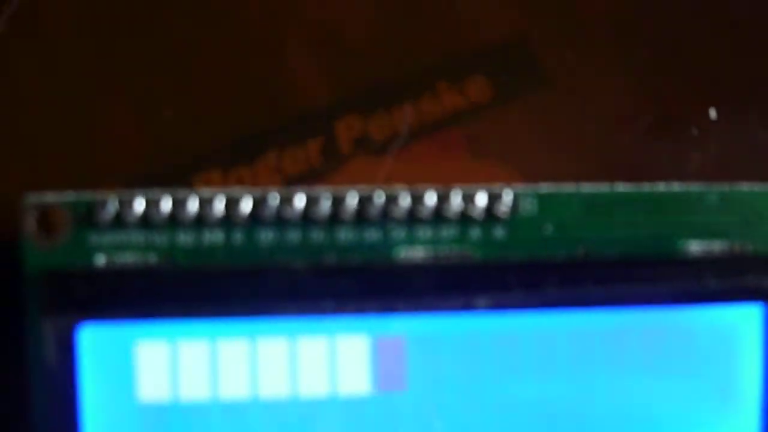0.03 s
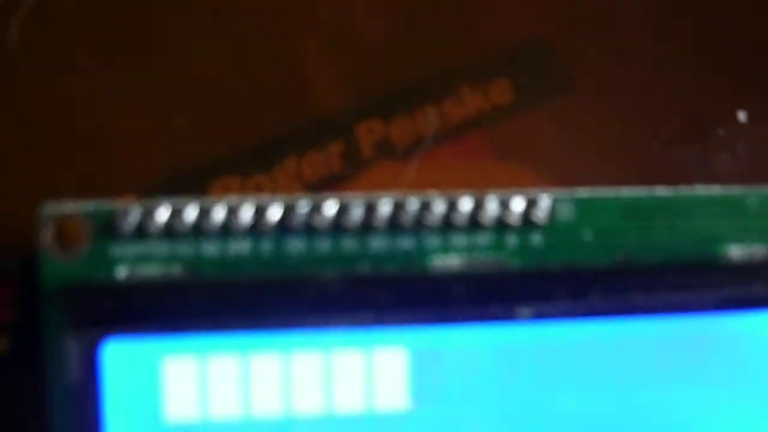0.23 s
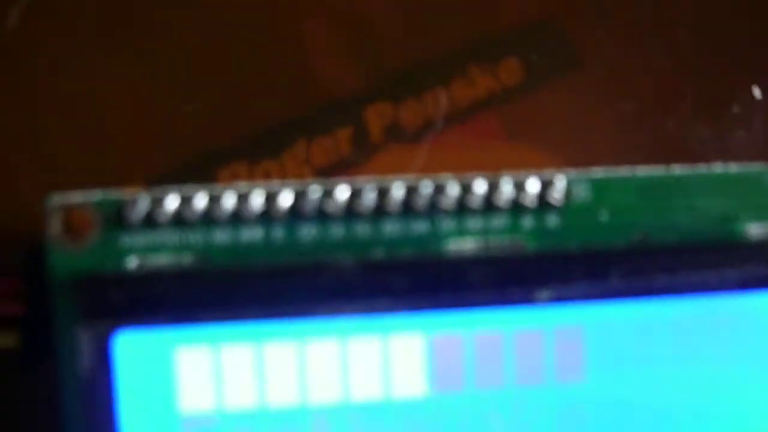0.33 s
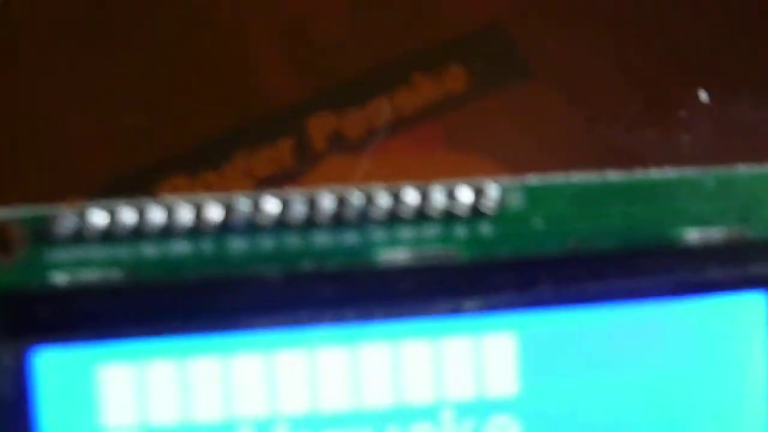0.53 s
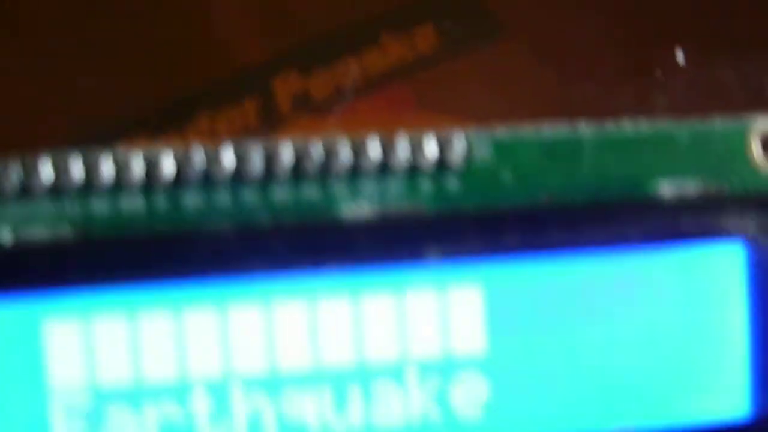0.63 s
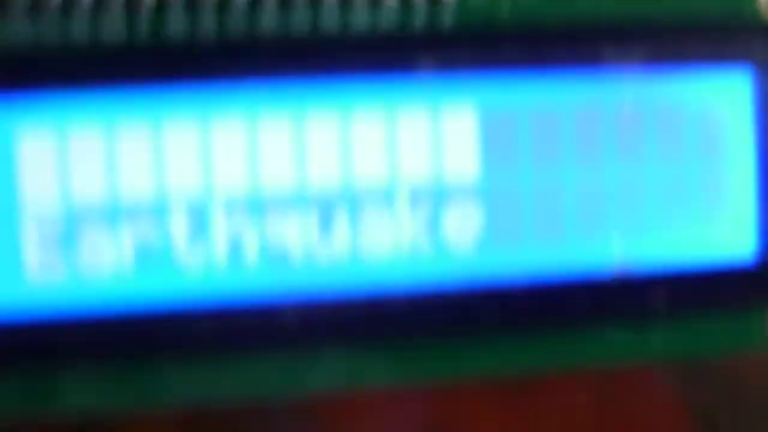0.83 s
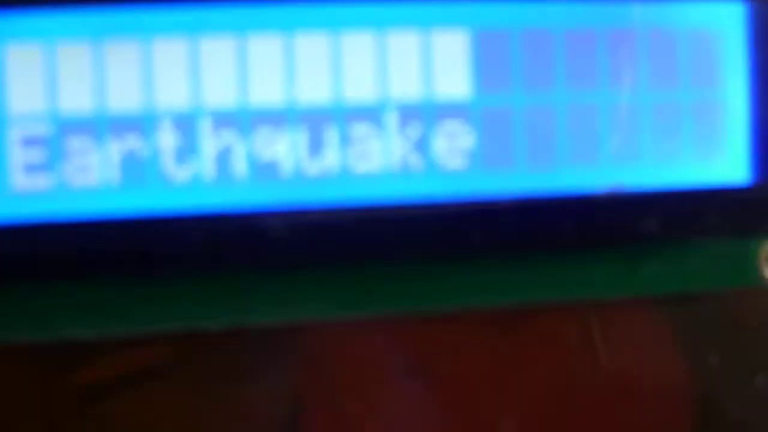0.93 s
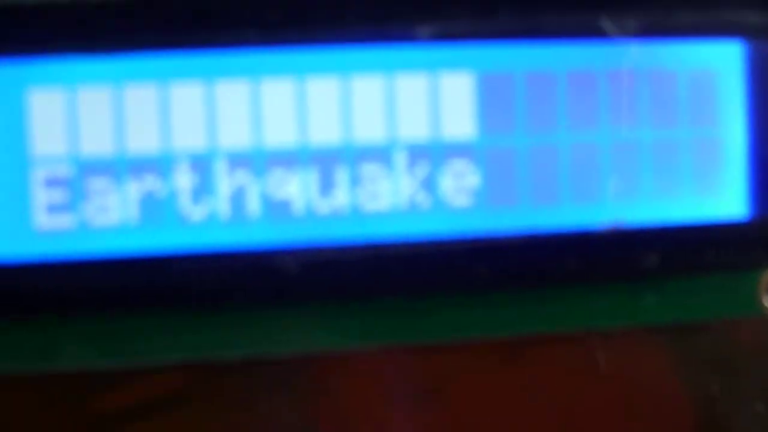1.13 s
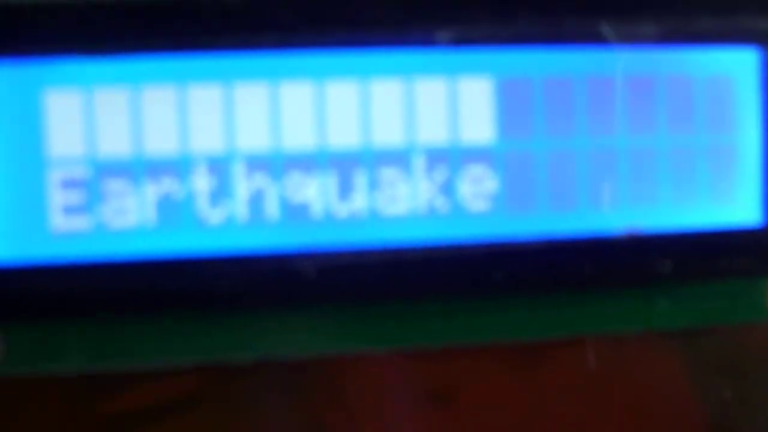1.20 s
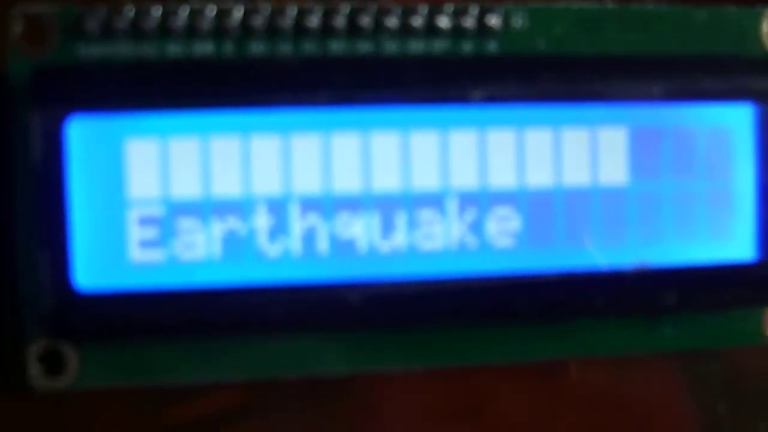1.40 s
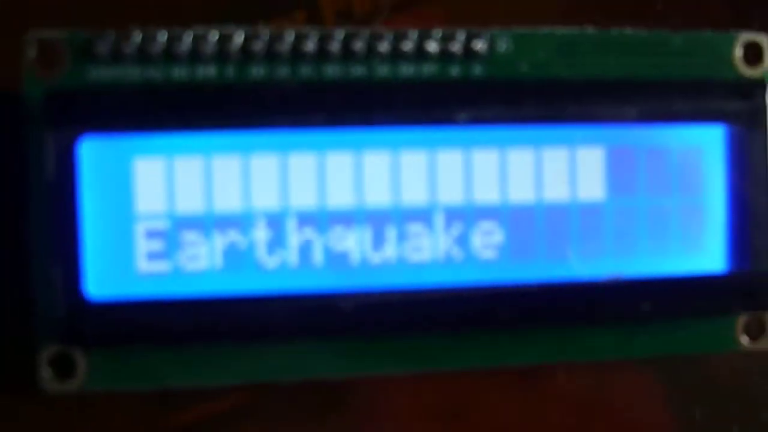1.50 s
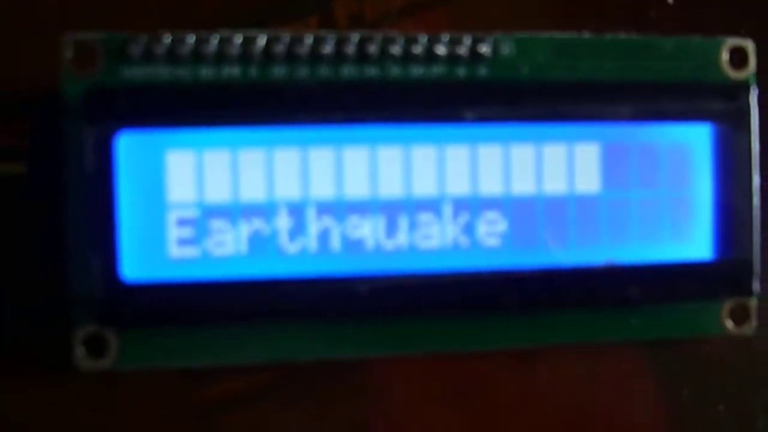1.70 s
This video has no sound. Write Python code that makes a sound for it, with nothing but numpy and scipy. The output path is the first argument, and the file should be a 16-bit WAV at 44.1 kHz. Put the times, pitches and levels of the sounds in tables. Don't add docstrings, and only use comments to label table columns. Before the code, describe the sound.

One hard hand bang on a wooden table, loose parts clattering briefly, over low room hum

```python
import sys
import numpy as np
from scipy import signal
from scipy.io import wavfile

SR = 44100
rng = np.random.default_rng(int(sys.argv[2]) if len(sys.argv) > 2 else 0)


def boost_factor(decibels):
    exponent = np.asarray(decibels, float) / 20
    return 10 ** exponent


def dump_mix(stems):
    frames = np.atleast_2d(stems).T
    limited = np.clip(frames, -1, 1)
    pcm = np.round(limited * 32767).astype(np.int16)
    wavfile.write(sys.argv[1], SR, pcm)


N = 77175

# f/Hz, level/dB [dB per Hz]
AIR_SPECTRUM = [(18, -40), (30, -26), (107, 1), (161, -10.5), (193, 4.5), (291, -4.5), (343, 0.5),
                (466, 0.5), (4000, -29.5), (5200, -59.5), (8800, -120)]
AIR_DB = -47
# f/Hz, width/Hz, level/dB
DRONES = [(54.6, 3, -58.5), (95.6, 8.4, -58.5), (116.4, 9, -54.5), (197, 5.2, -54), (241.4, 4.3, -57.5)]

# t/s, thud level/dB, crack level/dB, direction/sign
BLOWS = [
    (0.2097, -2, 1, 1),
    (0.2182, -20.5, -12.5, -1),
]
# f/Hz, level/dB, t60/s, direction/sign; the first is stirred by the hand only
TOP_MODES = [(121.6, -2.5, 0.52, -1), (159.8, -0.5, 0.072, 1), (208, -7.5, 0.35, 1), (282.2, -24, 0.34, 1),
             (332.6, -19.5, 0.29, 1), (394, -5, 0.036, 1), (577, -24, 0.13, 1), (620.7, -5, 0.062, 1),
             (940, -19, 0.049, 1), (1296, -31, 0.025, 1), (71.55, -29.5, 1, 1)]
# f/Hz, level/dB, t60/s, direction/sign
CRACK_MODES = [(784, -10, 0.007, 1), (1575, 11, 0.0012, 1), (2330, -11.5, 0.0056, 1), (3556, -14, 0.013, 1),
               (4640, -14, 0.0064, 1), (4910, -25.5, 0.0044, -1), (7550, -36.5, 0.0041, 1)]
PALM_HZ, SLAP_S, SLAP_DB = 507, 0.001, -27

# t/s, thud level/dB, click level/dB, direction/sign
HOPS = [
    (.2395, -17, -21.5, 1),
    (.2590, -13, -36, -1),
    (.2684, -7.5, -6.5, -1),
    (.2781, -12.5, -1.5, 1),
    (.2920, -18, -23, -1),
    (.3010, -39, -15, 1),
    (.3220, -21.5, -19, -1),
]
# f/Hz, level/dB, t60/s, direction/sign
BOARD_MODES = [(790, -17.5, .05, 1), (1058, -15, 0.024, -1), (1517, -13.5, 0.013, 1),
               (2126, -10, 0.011, -1), (3130, -11.5, 0.002, 1), (3960, -11.5, 0.0033, 1),
               (5080, -18.5, 0.009, -1), (5730, -14, 0.0038, 1), (7100, -21, 0.0065, 1)]
HOP_SLAP_S, HOP_SLAP_DB = 0.002, -20
MIC_LOW_HZ = 61.4

# f/Hz, level/dB [dB per Hz]
SHUDDER_SPECTRUM = [(29, -46), (60, -14), (110, -7), (230, -2.5), (500, -18.5), (1800, -31), (8000, -44.5),
                    (10400, -80)]
# t/s, level/dB
SWELLS = [
    (0.213, -18),
    (0.271, -19.5),
]
SHUDDER_DB, SWELL_S, LOW_T60_S, HIGH_T60_S = 24.5, 0.0052, 0.4, 0.44
ROOM_T60_S, ROOM_DB, WALL_HZ = 0.53, -28, 6700

# f/Hz, level/dB, t60/s
CHATTER_MODES = [(615, 13, 0.0027), (1550, 2, 0.0016), (2310, -13, 0.001), (3770, 3, 0.0012),
                 (5940, -7.5, 0.0043)]
RATTLE_PER_S, RATTLE_DB, RATTLE_FROM_S, RATTLE_T60_S = 1200, -31.5, 0.26, 0.28

# t/s, length/s, level/dB
SCUFFS = [
    (1.151, .024, -52),
    (.670, .015, -67),
]
# f/Hz, level/dB, t60/s
SCUFF_MODES = [(1250, -6, .012), (1550, 0, .015), (1850, -2, .01), (2350, -9, .008), (4100, -10, .005)]

CLIP_LEVEL, INPUT_HZ = 0.72, 7500
DUCK_DB, DUCK_S, HOLD_S, RECOVER_S = 9, 0.0025, 0.061, 0.56
HISS_DB, HISS_LOW_HZ, HISS_BUMP_HZ, HISS_BUMP_DB = -65.5, 1500, 7010, 4
TOP_CUT_HZ, DC_OFFSET = 8000 * 1.148, 0.0141


def rms_one(x):
    return x / np.sqrt(np.mean(x ** 2) + 1e-20)


def butter(x, order, hz, kind="low"):
    return signal.sosfilt(signal.butter(order, hz, kind, fs=SR, output="sos"), x)


def ring(clicks, hz, t60_s):
    r = boost_factor(-60 / (t60_s * SR))
    w = 2 * np.pi * hz / SR
    return signal.lfilter([0, np.sin(w)], [1, -2 * r * np.cos(w), r * r], clicks + 1e-18)


def body(clicks, modes):
    out = 0
    for hz, db, t60_s, *direction in modes:
        out = out + boost_factor(db) * np.sign(np.prod(direction)) * ring(clicks, hz, t60_s)
    return out


def burst(start_s, rise_s, fall_s):
    t = np.maximum(np.arange(N) / SR - start_s, 0)
    return (1 - np.exp(-t / rise_s)) * np.exp(-t / fall_s)


def bands(spectrum, gain, count):
    edges = 28 * 2 ** (np.arange(count) / 2)
    white = rng.standard_normal((2, N + SR))
    hz, db = np.transpose(spectrum)
    out = 0
    for k, (low, high) in enumerate(zip(edges, edges[1:])):
        band = butter(white[k % 2], 2, [low, high], "band")[SR:]
        level = boost_factor(np.interp(np.log(low * high) / 2, np.log(hz), db))
        out = out + band * level * gain(np.sqrt(low * high))
    return out


def drift(rate_hz):
    r = np.exp(-2 * np.pi * rate_hz / SR)
    return rms_one(signal.lfilter([1], [1, -2 * r, r * r], rng.standard_normal(N + SR))[SR:])


def air(patchy_db):
    rumble = bands(AIR_SPECTRUM, lambda hz: boost_factor(patchy_db * drift(5)), count=16)
    out = boost_factor(AIR_DB) * rms_one(rumble)
    for hz, width_hz, db in DRONES:
        t60_s = np.log(1000) / np.pi / width_hz
        drone = ring(rng.standard_normal(N + SR), hz, t60_s)[SR:]
        out += boost_factor(db) * rms_one(drone)
    return out


def strikes(contacts, spray_db, spray_s):
    thud, crack = np.zeros(N), np.zeros(N)
    spray = rng.standard_normal(N)
    for s, thud_db, crack_db, direction in contacts:
        i = int(s * SR)
        thud[i] += np.sign(direction) * boost_factor(thud_db)
        crack[i] += np.sign(direction) * boost_factor(crack_db)
        crack += boost_factor(crack_db + spray_db) * spray * burst(s, 1e-4, spray_s)
    return butter(thud, 2, PALM_HZ), crack


def table():
    push, crack = strikes(BLOWS, SLAP_DB, SLAP_S)
    nudge, click = strikes(HOPS, HOP_SLAP_DB, HOP_SLAP_S)
    low = body(push, TOP_MODES) + body(nudge, TOP_MODES[1:])
    thin = butter(low, 2, MIC_LOW_HZ, "high")
    return thin + body(crack, CRACK_MODES) + body(click, BOARD_MODES)


def shudder():
    def fade(hz):
        t60_s = np.interp(np.log(hz), np.log([100, 6000]), [LOW_T60_S, HIGH_T60_S])
        return sum(boost_factor(db) * burst(s, SWELL_S, t60_s / np.log(1000)) for s, db in SWELLS)
    return boost_factor(SHUDDER_DB) * bands(SHUDDER_SPECTRUM, fade, count=18)


def room(x):
    out = np.zeros(N)
    dull = np.exp(-2 * np.pi * WALL_HZ / SR)
    lags = (rng.uniform(0.0054, 0.04, 10) * SR).astype(int)
    for k, lag in enumerate(lags):
        loop, state = x.copy(), [0.]
        gain = boost_factor(-60 * lag / SR / ROOM_T60_S)
        for i in range(lag, N, lag):
            back, state = signal.lfilter([gain * (1 - dull)], [1, -dull], loop[i - lag:i], zi=state)
            loop[i:i + lag] += back[:N - i]
        out += (loop - x) * (-1) ** k
    return butter(out, 2, 300, "high")


def grains(rate_per_s):
    hits = rng.random(N) < rate_per_s / SR
    size = boost_factor(3.1 * np.minimum(rng.exponential(1, N), 4))
    return hits * size * rng.choice([-1, 1], N)


def rattle():
    clicks = grains(RATTLE_PER_S) * burst(RATTLE_FROM_S, 0.003, RATTLE_T60_S / np.log(1000))
    return boost_factor(RATTLE_DB) * body(clicks, CHATTER_MODES)


def scuffs():
    shape = sum(boost_factor(db) * burst(s, length_s / 3, length_s / 2) for s, length_s, db in SCUFFS)
    return body(rng.standard_normal(N) * shape, SCUFF_MODES)


def scene():
    near = table() + rattle() + scuffs()
    return (near + boost_factor(ROOM_DB) * room(near) + shudder() + air(patchy_db=0.5))[None]


def low_pass(x):
    return signal.sosfilt(signal.butter(12, 8970, fs=SR, output="sos"), x)


def record(dry):
    t = np.maximum(np.arange(N) / SR - BLOWS[0][0], 0)
    recovery = np.exp(-(np.maximum(t - HOLD_S, 0) / RECOVER_S) ** 2)
    duck = (1 - np.exp(-t / DUCK_S)) * recovery
    white = rng.standard_normal(N)
    hiss = rms_one(butter(white, 1, HISS_LOW_HZ, "high"))
    hiss = hiss + 0.5 * boost_factor(HISS_BUMP_DB) * rms_one(ring(white, HISS_BUMP_HZ, 0.00048))
    x = butter(np.clip(dry, -CLIP_LEVEL, CLIP_LEVEL), 2, INPUT_HZ)
    x = x * boost_factor(-DUCK_DB * duck) + boost_factor(HISS_DB - 0.9 * duck) * hiss
    top_cut = signal.cheby2(16, 70, TOP_CUT_HZ, fs=SR, output="sos")
    mix = signal.sosfilt(top_cut, x) + DC_OFFSET
    return low_pass(mix)


dry = scene()
out = record(dry)
dump_mix(out)
```